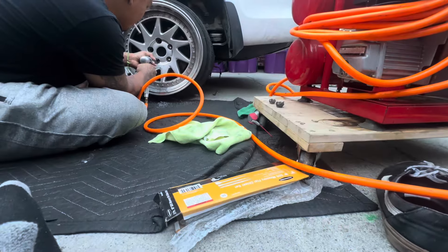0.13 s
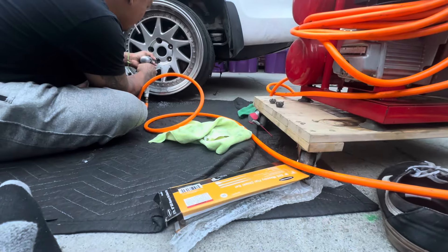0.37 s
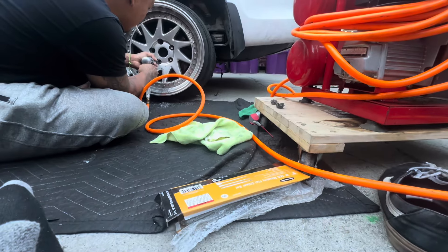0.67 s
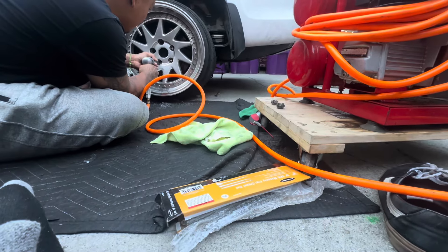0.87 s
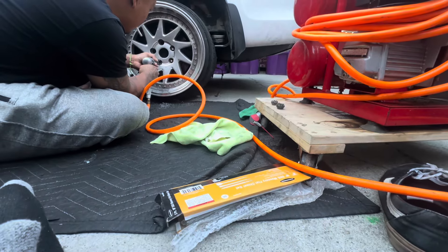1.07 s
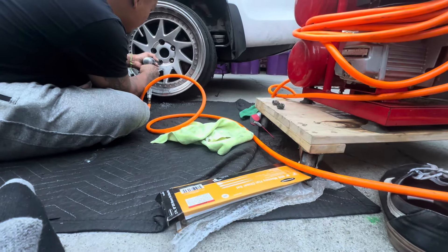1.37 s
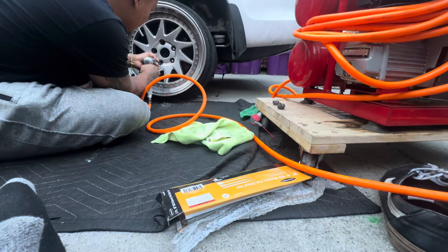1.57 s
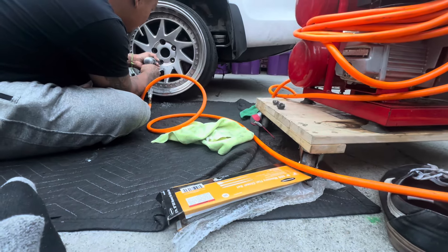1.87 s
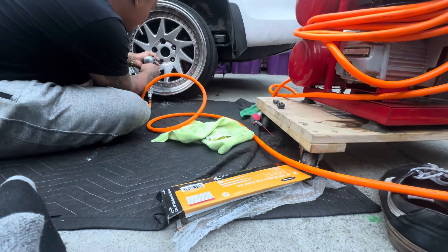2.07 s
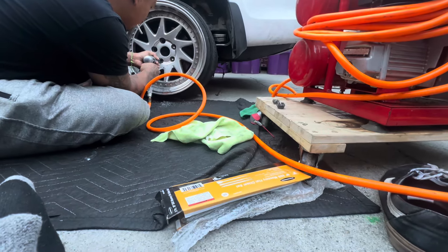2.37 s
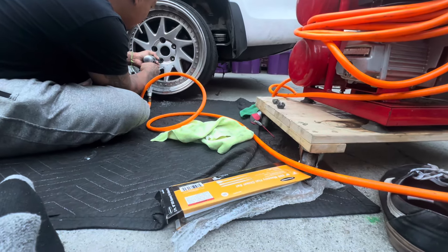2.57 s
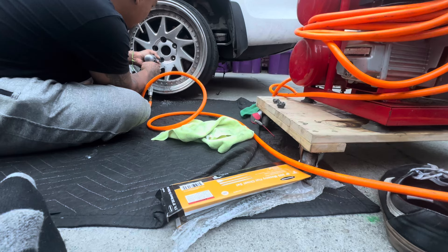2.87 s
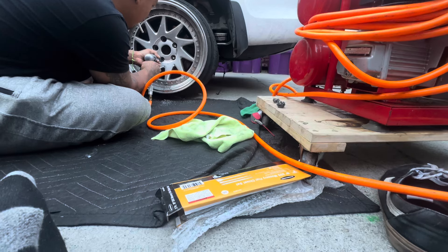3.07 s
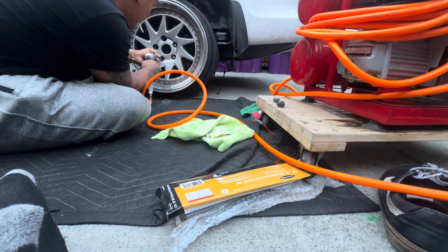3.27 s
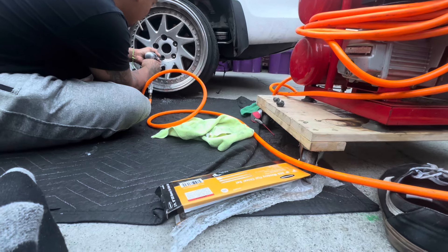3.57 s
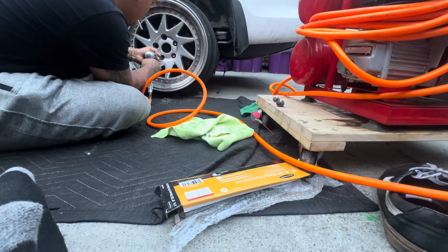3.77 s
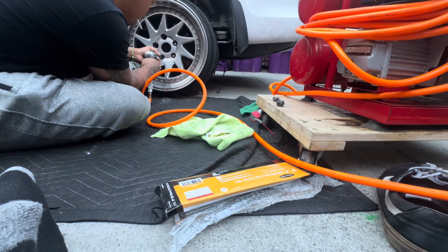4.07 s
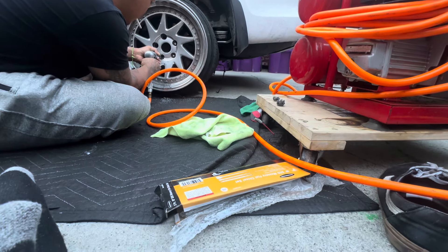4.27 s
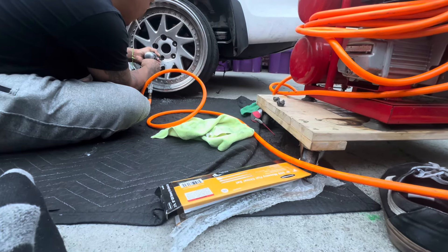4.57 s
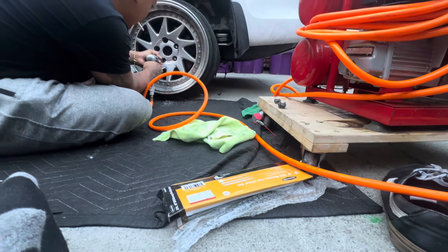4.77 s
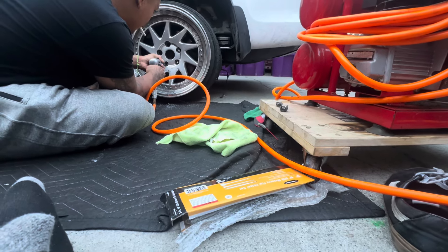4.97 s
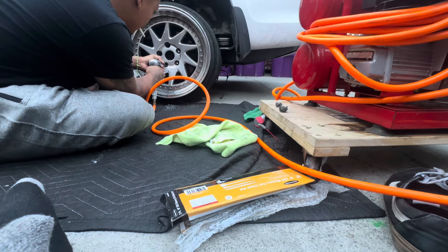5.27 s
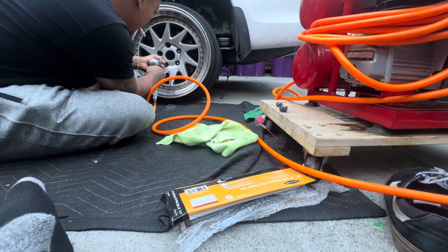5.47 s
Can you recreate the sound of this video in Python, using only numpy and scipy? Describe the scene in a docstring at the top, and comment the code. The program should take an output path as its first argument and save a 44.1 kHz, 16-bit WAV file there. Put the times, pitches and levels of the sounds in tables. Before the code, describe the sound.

Continuous buzzing rattle of a pneumatic chisel against a ringing metal wheel, with puffs of air and a compressor humming underneath.

```python
"""Air chisel on a wheel hub

An air chisel hammers a car wheel hub about 55 times a second, slowing once as the trigger eases.
Each blow rings the alloy wheel, cracks, and puffs out air; a piston compressor hums close by.
Two spaced microphones hear it on a concrete drive, and their stand is bumped three times."""
import sys
import numpy as np
from scipy import signal
from scipy.fft import rfft, irfft, next_fast_len
from scipy.io import wavfile
from scipy.ndimage import uniform_filter1d

SR = 44100
rng = np.random.default_rng(int(sys.argv[2]) if len(sys.argv) > 2 else 0)


def generate_wav(sig):
    """Save sig (samples, or channels by samples) to the path in sys.argv[1] as 16-bit PCM at SR."""
    pcm = np.round(np.clip(np.atleast_2d(sig).T, -1, 1) * 32767).astype(np.int16)
    wavfile.write(sys.argv[1], SR, pcm)


N = 248283
T = np.arange(N) / SR
FFT_SIZE = next_fast_len(N + 8192)
HZ = np.fft.rfftfreq(FFT_SIZE, 1 / SR)
FULL_BLOW_DB = -24

# how fast the chisel's piston runs: time_s, blows_per_s
PISTON_SPEED = [(0.0, 46.95), (0.29, 54.05), (0.54, 52.43), (0.86, 55.39), (1.55, 54.06), (1.8, 57.95),
                (2.05, 54.15), (2.72, 60.58), (2.74, 57.81), (2.96, 61.08), (3.12, 40.74), (3.3, 33.28),
                (3.45, 49.38), (3.75, 53.61), (4.06, 47.44), (4.29, 51.06), (5.11, 55.07), (5.63, 55.68)]


def gain(db):
    """Turns decibels into a multiplier."""
    return 10 ** (np.asarray(db) / 20)


def unit_level(x):
    """Scales a sound to an average (rms) level of 1."""
    return x / np.sqrt(np.mean(x ** 2) + 1e-20)


def coloured(x, points):
    """Filters a sound along a curve of (pitch_hz, level_db) points."""
    hz, db = np.transpose(points)
    curve = gain(np.interp(np.log(HZ + 1), np.log(hz), db))
    return irfft(rfft(x, FFT_SIZE) * curve, FFT_SIZE)[..., :N]


def ring(x, tones, swell_hz, flipped_hz=()):
    """Rings an object's natural tones; a blow takes time to spread, so they swell in."""
    response = np.zeros((2, len(HZ)), complex)
    for hz, width, db, pan_db, lead in tones:
        sign = -1 if hz in flipped_hz else 1
        tone = sign * gain(db) / (1 + 2j * (HZ - hz) / width)
        tone /= 1 + 2j * (HZ - hz) / swell_hz
        response += tone * np.array([[gain(pan_db / 2)], [gain(-pan_db / 2) * np.exp(1j * lead)]])
    return irfft(rfft(x, FFT_SIZE) * response, FFT_SIZE)[:, :N]


def blow_strength(full_per_s=54.2, db_per_halving=12.5, regrip_s=3.09):
    """Blow level in dB: a faster piston, up to full speed, and a firmer grip hit harder."""
    speed = np.minimum(np.interp(T, *np.transpose(PISTON_SPEED)) / full_per_s, 1)
    grip_db = 2 * np.exp(-T / 0.33)  # firm at first
    grip_db -= (T > regrip_s) * np.exp(-np.maximum(T - regrip_s, 0) / 2.3)  # lighter after slowing
    return FULL_BLOW_DB + db_per_halving * np.log2(speed) + uniform_filter1d(grip_db, SR // 10)


def blows(spread_db, jitter_s):
    """One click for each piston stroke, a little uneven in time and strength."""
    strokes = np.floor(.2 + np.cumsum(np.interp(T, *np.transpose(PISTON_SPEED))) / SR)
    starts = np.flatnonzero(np.diff(strokes))
    strength, late = rng.standard_normal((len(starts), 2)).T
    starts += (late * jitter_s * SR).astype(int)
    clicks = np.zeros(N)
    clicks[np.clip(starts, 0, N - 1)] = gain(spread_db * strength)
    clicks[0] = 1  # the stroke under way still rings
    return clicks


def bursts(clicks, fade_s, leak_db, rise_s=0.00088):
    """Loudness after each click, falling 60 dB in fade_s, over an air leak that thins with weaker blows."""
    burst = gain(-60 * T[:8192] / fade_s) * (1 - np.exp(-T[:8192] / rise_s))
    leak = gain(leak_db + 0.27 * (blow_strength() - FULL_BLOW_DB))
    return signal.oaconvolve(clicks, burst)[:N] + leak


def grit(spread_db):
    """Three noises with grains of uneven size, as loose steel chatters."""
    grain_size = gain(spread_db * unit_level(uniform_filter1d(rng.standard_normal((3, N)), 20)))
    return rng.standard_normal((3, N)) * grain_size


def metal_ring(strikes):
    """The struck wheel and the tool ring at their own pitches."""
    # the alloy wheel's tones: pitch_hz, width_hz, level_db, left_over_right_db, right_lead_rad
    wheel = [(1345, 50, -18, -2, 2.5), (1640, 62, -11, 1, 1.4), (2200, 75, -11.5, 1, .9),
             (2560, 50, -14, 0, -.9), (3120, 60, -13, -5, -2.6), (3290, 30, -14, 0, -1.2),
             (3570, 40, -11, 4, 1.2), (3626, 30, -9, 4, 1.2), (3760, 60, -21, 4, 1.2),
             (3856, 30, -13, 6, -1.6), (3928, 35, -10.5, 4, 1.0), (3975, 30, -14, 4, 1.0),
             (4390, 40, -6.5, -6, -.2), (4560, 40, -10, 3, -2.5), (4740, 45, -4, 9, -2.7),
             (4880, 60, -12, 8, -2.4), (4975, 45, -3.5, 10, -2.8), (5220, 55, -11, 0, 1.2),
             (5680, 30, -12, 5, 2.9), (5915, 60, -12, -2, -.3), (6150, 70, -21, 2, 0),
             (6309, 35, -12, 1, -2.1), (6610, 57, -17, 6, 1.4), (7040, 80, -18, 6, 1.9),
             (7719, 46, -20, 4, 1.0), (7975, 30, -16, -4, .2), (8110, 40, -9, 1, -.3),
             (8559, 36, -18, -1, .1), (8871, 50, -21, 2, -.2), (9160, 30, -9, -3, 1.2)]
    # the steel bit and tool barrel: same columns
    bit = [(9700, 150, -21, 0, .1), (10180, 110, -18, 0, 2.2), (10411, 80, -13, 0, 3.0),
           (10750, 120, -21, 0, 3.14), (11150, 70, -21, 0, 3.14), (11750, 120, -24, 0, 3.14),
           (12190, 55, -18, 0, -3.0), (12720, 60, -18, 0, -1.7), (13200, 120, -22, 0, -.3),
           (13600, 70, -21, 0, 0), (14100, 60, -22, 0, 0), (14480, 110, -23, 0, 0), (14820, 110, -21, 0, 0),
           (15100, 90, -22, 0, 0), (15450, 130, -24, 0, 0)]
    # flipped tones start out against a close neighbour, so the pair peaks late
    return unit_level(ring(strikes, wheel + bit, swell_hz=252, flipped_hz=(3626, 3928)))


def crack(clicks, shared_grit, opposed_grit):
    """Steel hits steel with a sharp burst of noise."""
    # the part both microphones hear in step: pitch_hz, level_db
    shared_curve = [(600, -73), (1000, -17.5), (1900, -32), (2400, -9), (2900, -8.5), (4800, -12.5),
                    (5500, -16.5), (6000, -13.5), (7500, -15), (8400, -15), (9800, -13.5), (10400, -13),
                    (10700, -80), (12000, -45), (12500, -13.5), (15800, -23)]
    # the part that pushes at one and pulls at the other: pitch_hz, level_db
    opposed_curve = [(600, -20), (900, -28), (1400, -4), (2300, -4.5), (4700, -6), (6500, -10.5),
                     (7600, -12), (8400, -32), (9100, -7.5), (9600, -9), (10300, -30), (11400, -28),
                     (12300, -8), (13300, -17.5), (14000, -35)]
    # the wheel is on the left and the housing shades the right microphone: pitch_hz, left_over_right_db
    shade = [(1000, -3), (3000, -7), (4800, 5.5), (7000, 2), (8000, 0.8)]
    shared = coloured(bursts(clicks, 0.1, leak_db=-3, rise_s=0.0017) * shared_grit, shared_curve)
    opposed = coloured(bursts(clicks, 0.079, leak_db=-7, rise_s=0.0006) * opposed_grit, opposed_curve)
    return unit_level(np.array([coloured(shared + opposed, shade), shared - opposed]))


def spoke(clicks, blow_db, pitch_hz=2642, width_hz=14, slip_rad=0.71, waver_db=2):
    """Blows land nearly in step with a spoke's own swing, so it sings on, slipping a little each time."""
    # the ring slowly swells and sinks: time_s, level_db
    swell = [(0, -5), (.25, 0.5), (.5, -2), (.7, 0), (.9, 4), (1.2, 2.5), (1.5, 0), (2.1, 0), (2.4, -1.5),
             (2.68, 0), (2.97, -2), (3.3, -1.5), (3.6, -3), (4.1, -0.5), (4.6, -1.5), (5.15, 0.5),
             (5.63, -1.5)]
    slips = np.cumsum((clicks > 0) * slip_rad * rng.standard_normal(N))
    decay = np.exp(-np.pi * width_hz / SR)
    swing = uniform_filter1d(signal.lfilter([1], [1, -decay], clicks), 90)
    phase = 2 * np.pi * pitch_hz * T + uniform_filter1d(slips, 300) + np.array([[0], [-.9]])
    tone = swing * np.sin(phase) * gain([[-1], [1]])
    span = round(0.0075 * SR)
    waver = unit_level(uniform_filter1d(uniform_filter1d(rng.standard_normal(N), span), span))
    level_db = -32 + 0.99 * (blow_db - FULL_BLOW_DB) + np.interp(T, *np.transpose(swell))
    return gain(level_db + waver_db * waver) * unit_level(tone)


def exhaust(pulses, blow_db):
    """The air puffs are all alike, so they have a pitch; they weaken less than the blows."""
    # the air outlet and wheel well: pitch_hz, width_hz, level_db, left_over_right_db, right_lead_rad
    hollows = [(119, 56, -14.5, -17.5, 2.34), (254.3, 62.4, 7, 3, 0.41), (380.6, 47, 6.5, 1, -1.8),
               (571, 46, 2, 18.5, -1.46), (898, 6100, -14.5, -19, 0.25)]
    return gain(0.87 * blow_db - 12.5) * unit_level(ring(pulses, hollows, swell_hz=233))


def chisel():
    """The same piston strokes drive the ring, the crack, the spoke and the puffs."""
    blow_db = blow_strength()
    clicks = blows(spread_db=.9, jitter_s=.00012)
    scrape, shared_grit, opposed_grit = grit(spread_db=1)
    chatter = bursts(clicks, 0.0021, leak_db=-4.5) * scrape  # the loose bit scrapes after it strikes
    metal = metal_ring(clicks + gain(-32) * chatter)
    cracks = echoed(crack(clicks, shared_grit, opposed_grit))
    steel = gain(blow_db) * (gain(-0.88) * metal + gain(-3) * cracks)
    return steel + spoke(clicks, blow_db) + exhaust(clicks + gain(-38) * chatter, blow_db)


def compressor(shaft_hz=56.25, hum_db=-41, fan_db=-42):
    """The pump hums at multiples of its shaft speed, over a steady rush of air."""
    # the pump's tones: shaft_multiple, level_db
    pump_tones = [(1, -6), (2, 0.5), (3, -8), (4, -1), (5, -1.5), (6, -17), (7, -3.5), (8, -7.5), (9, -4.5),
                  (10, 3), (11, -2.5), (14, -9.5), (15, -13.5), (16, -4.5), (17, -10), (18, -30), (19, -11),
                  (20, -21), (22, -20), (23, -26), (24, -10.5)]
    # motor fan and street noise: pitch_hz, level_db
    fan_curve = [(18, -42), (30, 0), (275, -27), (336, -6), (560, 9.5), (683, -6), (1940, -5.5), (2640, -4),
                 (6000, -1), (7800, -53), (13200, -120)]
    hum = np.zeros((2, N))
    for multiple, db in pump_tones:
        start = 2 * np.pi * rng.random()
        lead = 0.098 * multiple * rng.standard_normal()  # higher tones reach the two sides out of step
        hum += gain(db) * np.sin(2 * np.pi * shaft_hz * multiple * T + start + np.array([[0], [lead]]))
    noise = rng.standard_normal((3, N))
    fan = unit_level(coloured(noise[:2] + 1.15 * noise[2], fan_curve))
    return gain(hum_db) * hum + gain(fan_db) * fan


def echoed(x):
    """Adds two strong early echoes from nearby surfaces."""
    # bounces off the ground and car: delay_s, left_db, right_db
    echoes = [(.0045, -7, -7), (.0088, -7.5, -14)]
    taps = np.zeros((2, 1024))
    taps[:, 0] = 1
    for delay_s, left_db, right_db in echoes:
        taps[:, round(delay_s * SR)] = gain([left_db, right_db])
    return unit_level(signal.oaconvolve(x, taps, axes=1)[:, :N])


def yard(x, fade_s):
    """The car body and walls send back a short tail of echoes, different on each side."""
    t = T[:12000]
    taps = rng.choice([-1., 1.], (2, len(t))) * (rng.random((2, len(t))) < .05)
    taps *= gain(-60 * t / fade_s) * (t > .004)
    tail = signal.fftconvolve(x, taps / np.linalg.norm(taps[0]), axes=1)[:, :N]
    return coloured(tail, [(200, -13), (1000, 7), (7000, 10), (9500, -41)])


def bumps():
    """Knocks on the microphone stand make dull thuds that drop in pitch."""
    # the knocks: start_s, level_db, base_pitch_hz, left_over_right_db, fade_s
    knocks = [(2.708, -31, 62, 5, .09), (2.902, -20, 80, 10, .09), (2.99, -30, 48, 4, .17)]
    out, t = np.zeros((2, N)), T[:6000]
    for start_s, db, base_hz, pan_db, fade_s in knocks:
        pitch_hz = base_hz * (.7 + 1.3 * np.exp(-t / .012) + 4 * np.exp(-t / .0012))
        loudness = gain(db - 60 * t / fade_s) * (1 - np.exp(-t / .002))
        thud = loudness * np.sin(2 * np.pi * np.cumsum(pitch_hz) / SR)
        start = round(start_s * SR)
        out[:, start:start + len(t)] += thud * gain([[pan_db / 2], [-pan_db / 2]])
    return out


def scene():
    """The chisel with its echoes, the compressor and the bumps."""
    tool = chisel()
    return tool + gain(-16.5) * yard(tool, fade_s=0.23) + compressor() + bumps()


def record(dry, low_hz=30, high_hz=15780):
    """The microphones lose the deepest bass and the highest treble."""
    thinned = signal.sosfilt(signal.butter(2, low_hz, "high", fs=SR, output="sos"), dry)
    treble_cut = signal.firwin(1023, high_hz, window=("kaiser", 9), fs=SR)
    return signal.oaconvolve(thinned, treble_cut[None], "same")


dry = scene()
out = record(dry)
generate_wav(out)
```